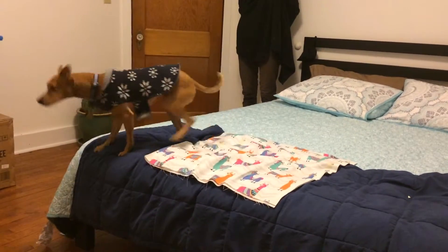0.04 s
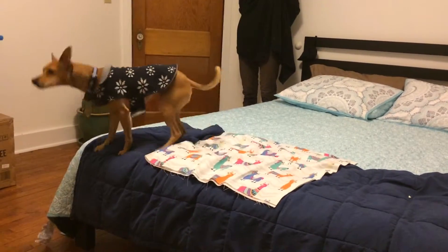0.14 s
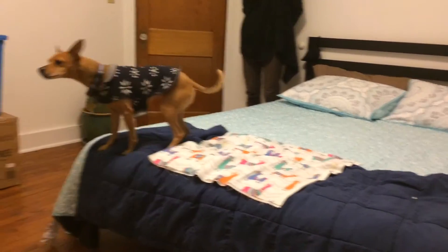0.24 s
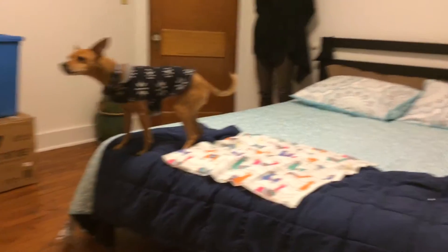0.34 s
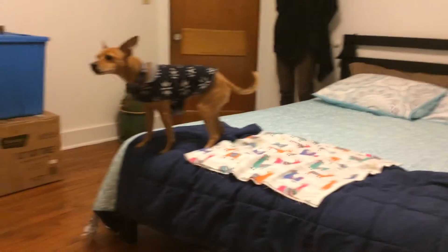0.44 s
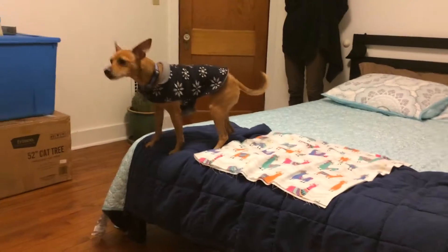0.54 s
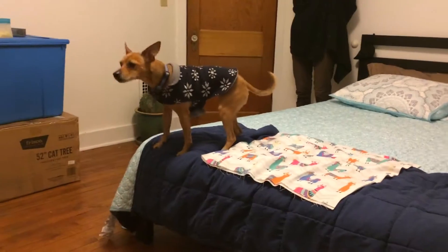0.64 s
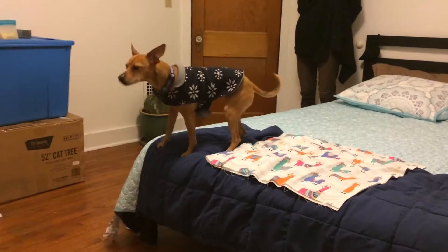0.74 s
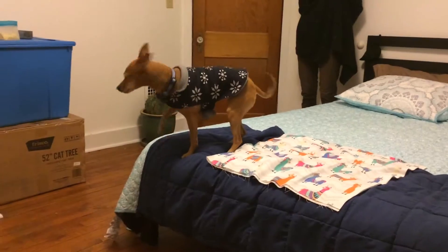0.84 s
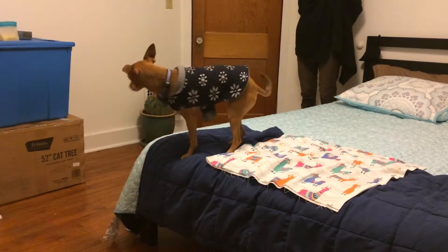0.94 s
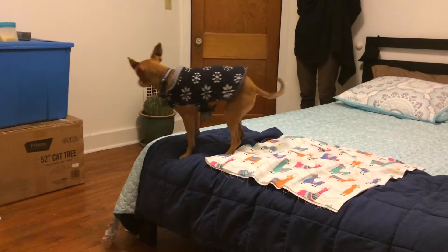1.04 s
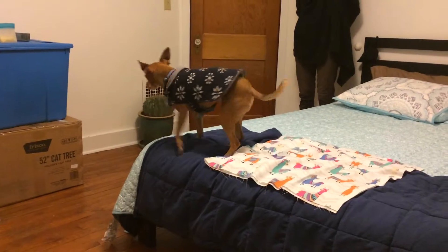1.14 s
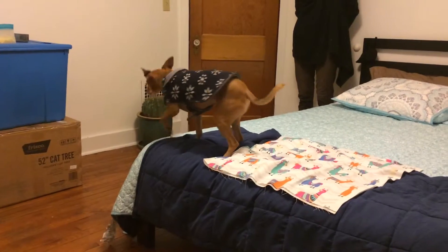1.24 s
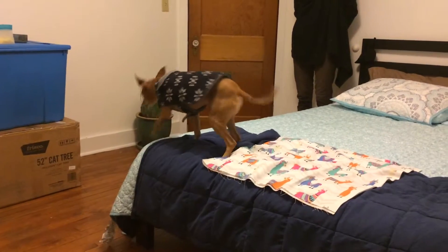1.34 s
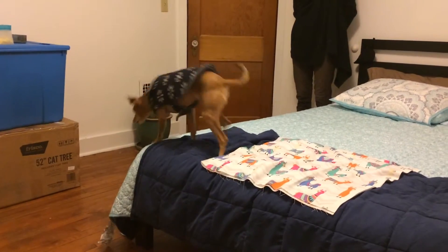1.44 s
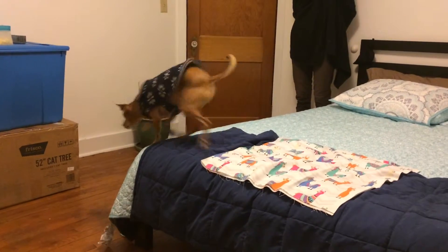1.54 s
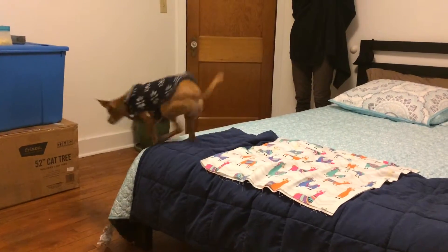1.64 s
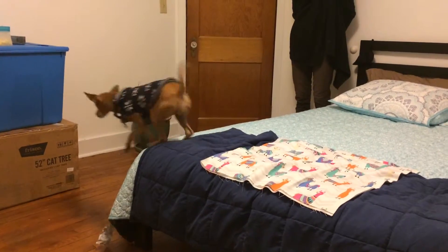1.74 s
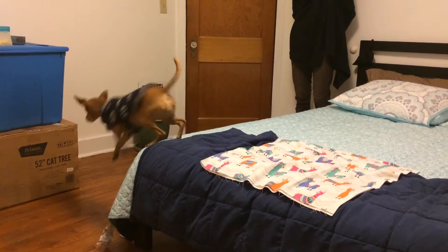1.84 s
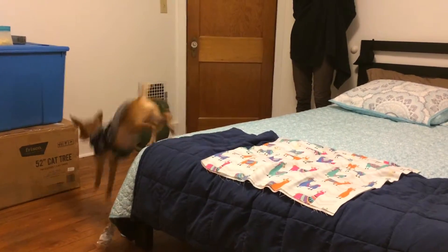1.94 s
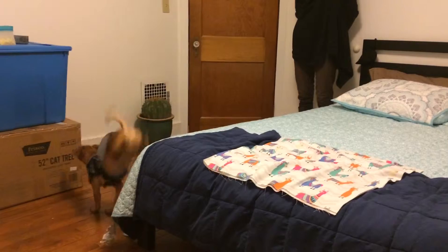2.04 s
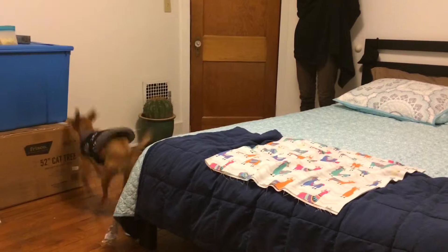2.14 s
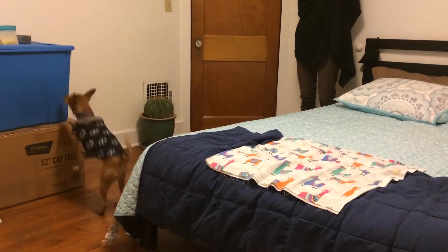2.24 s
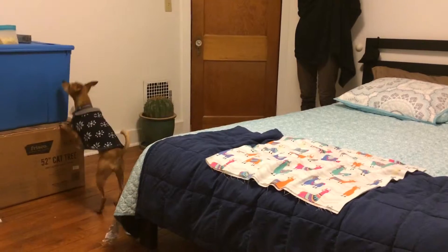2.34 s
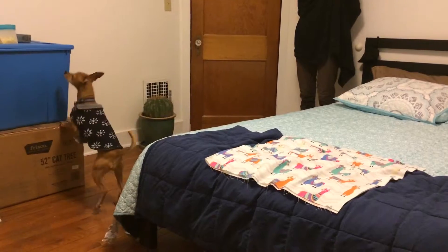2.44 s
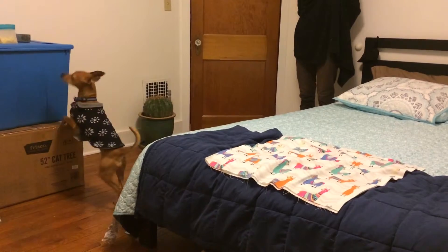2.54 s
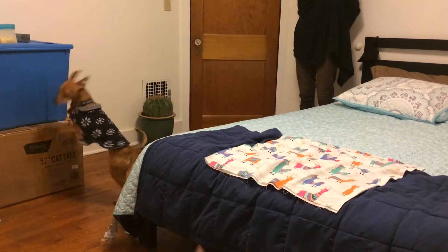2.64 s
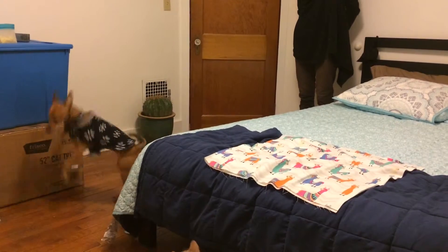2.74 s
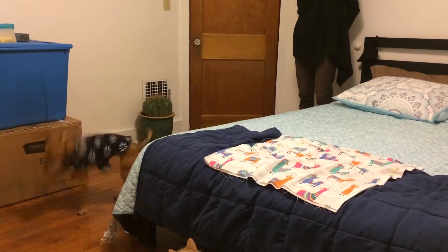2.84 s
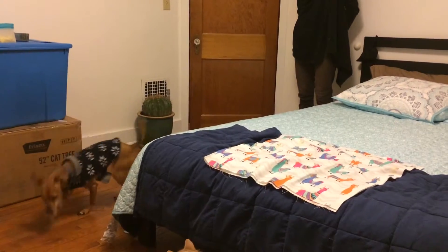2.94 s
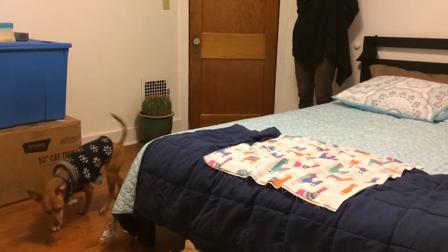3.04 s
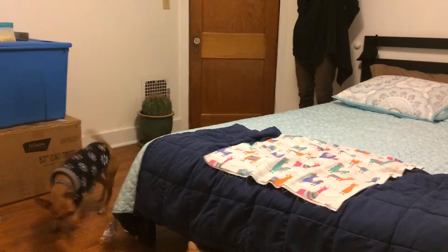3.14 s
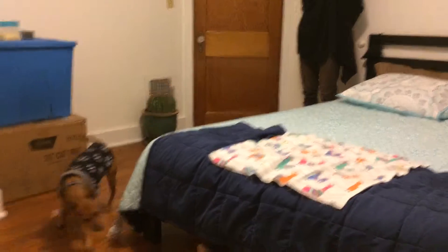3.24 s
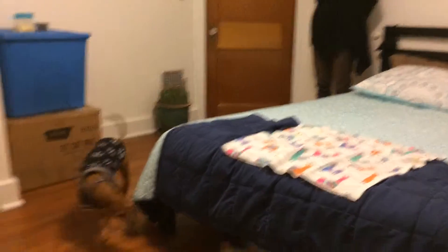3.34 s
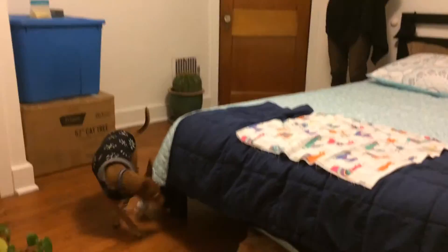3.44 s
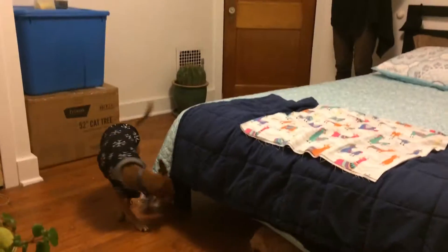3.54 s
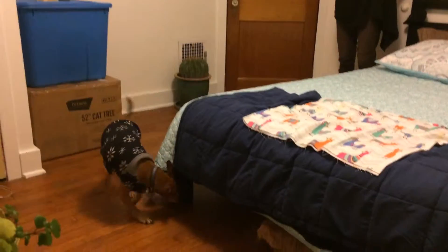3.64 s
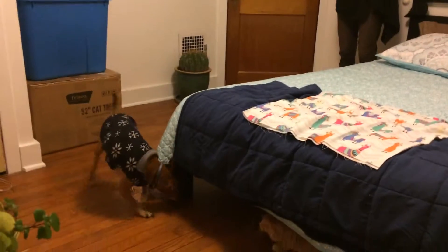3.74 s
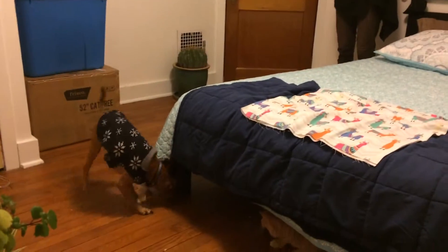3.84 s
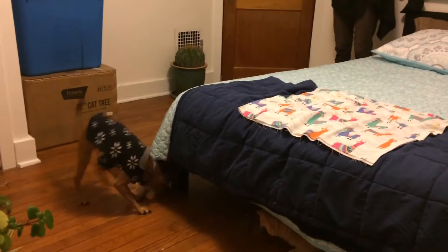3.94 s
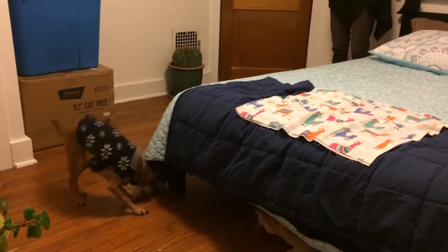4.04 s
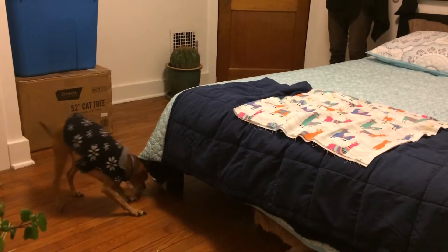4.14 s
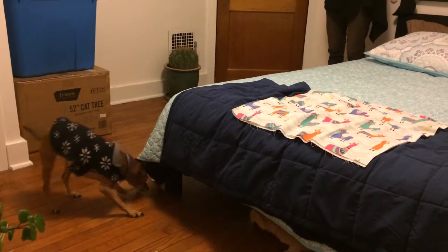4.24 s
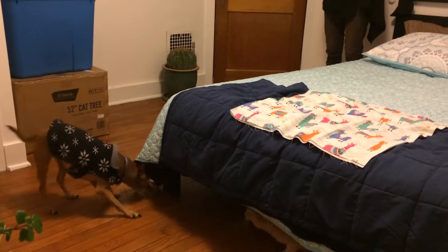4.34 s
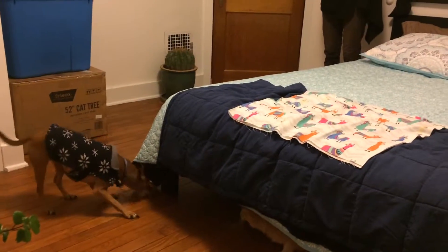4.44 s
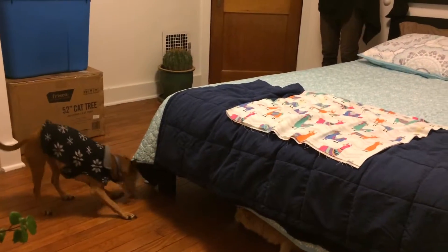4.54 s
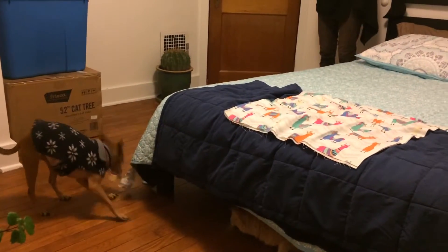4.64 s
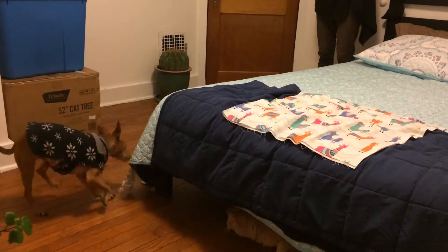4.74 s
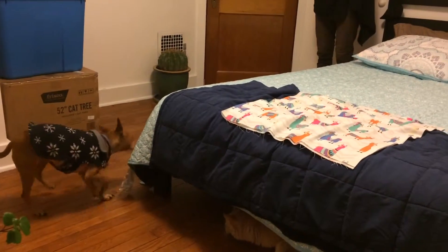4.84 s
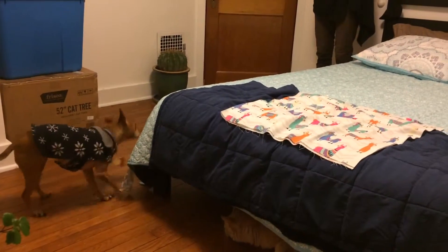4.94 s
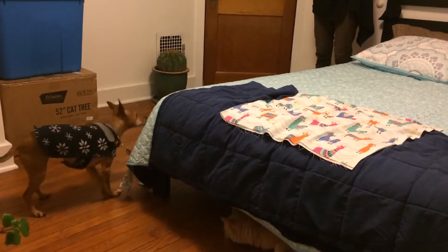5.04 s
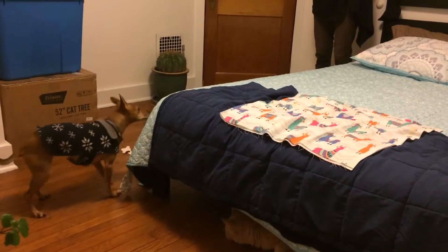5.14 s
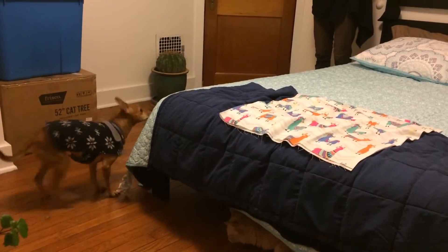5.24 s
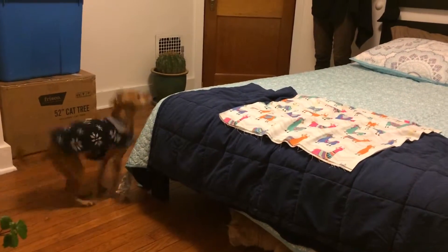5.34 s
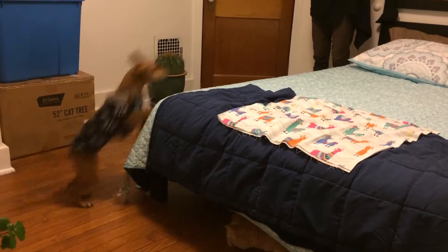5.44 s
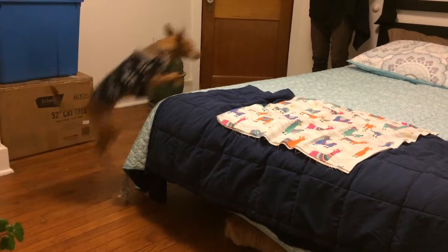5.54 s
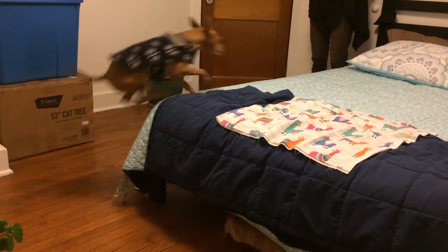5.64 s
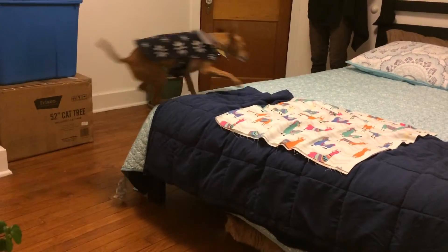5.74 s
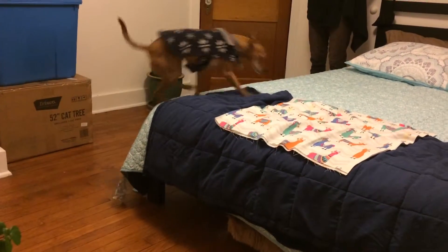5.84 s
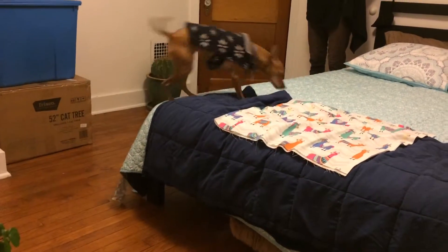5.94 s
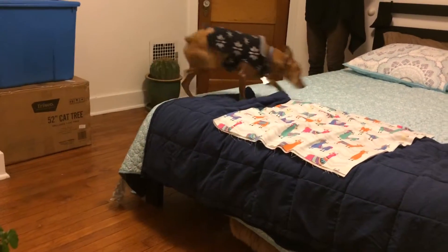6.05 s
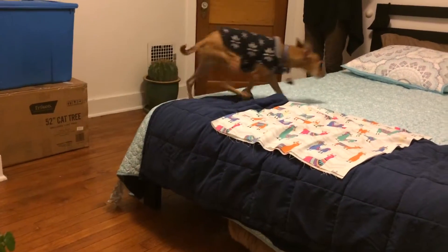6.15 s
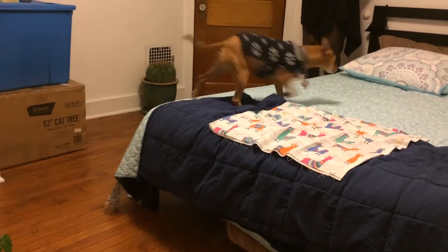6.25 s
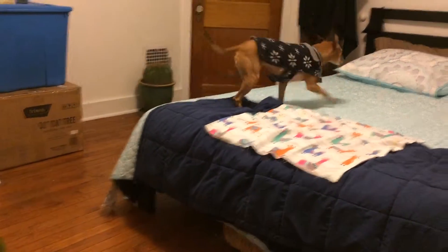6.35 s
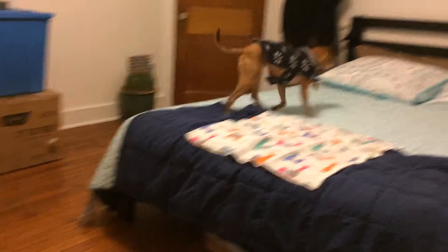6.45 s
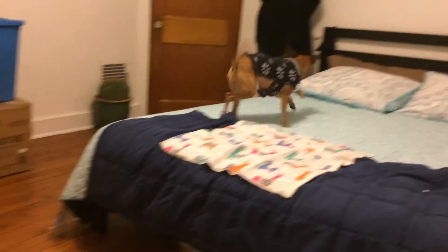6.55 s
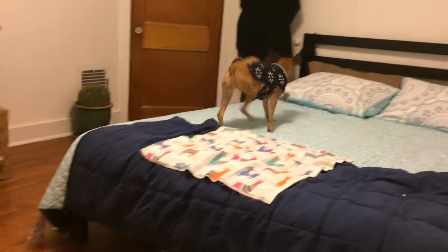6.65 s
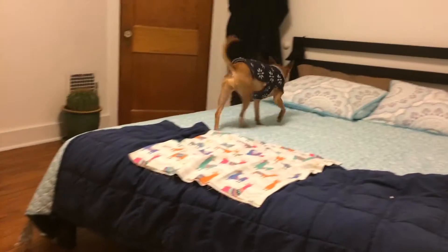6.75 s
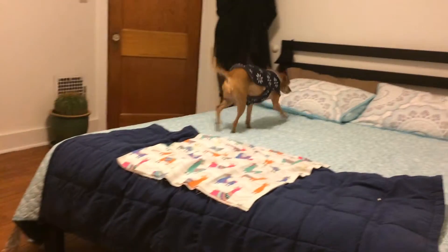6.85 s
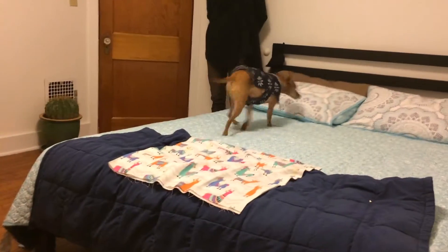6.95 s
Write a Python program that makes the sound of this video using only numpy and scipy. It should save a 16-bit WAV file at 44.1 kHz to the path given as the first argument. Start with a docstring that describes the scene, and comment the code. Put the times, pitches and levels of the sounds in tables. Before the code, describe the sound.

A small dog in a sweater rustles faintly on a bed, then drops to a wooden floor with a cluster of thumps, claw clicks and a short scrape. Its paws knock a cardboard box, tags clink, and it potters with sparse ticks. It springs back onto the bed with a bright tag jingle, then soft padding. A small, lightly reverberant bedroom, heard from a few steps away over low air noise and a faint whine.

```python
"""In a small bedroom with steady air noise and a faint whine, a small dog in a sweater steps over a quilt,
jumps down to a wooden floor, paws at a cardboard box and potters about.
Paws thump as ringing floorboards, claws tick as short bursts of coloured noise, sliding paws and
cloth are gritty noise, and collar tags are ringing metal tones. The room fades after each sound."""
import sys
import numpy as np
from scipy import signal
from scipy.fft import rfft, irfft
from scipy.io import wavfile

SR = 44100
rng = np.random.default_rng(int(sys.argv[2]) if len(sys.argv) > 2 else 0)


def store_wav(level_fs):
    """Save 16-bit WAV to argv[1]."""
    pcm = np.round(np.clip(np.atleast_2d(level_fs), -1, 1) * 32767)
    wavfile.write(sys.argv[1], SR, pcm.T.astype(np.int16))


N = 309226  # length in samples, about 7 s

# The time in which cloth strokes sound thinner and light claw ticks may fall: start and end in seconds.
THIN_CLOTH_AND_TICKS_S = (2.45, 7)


def undb(db):
    """Turn decibels into a plain factor."""
    return 10 ** (np.asarray(db) / 20)


def unit(x):
    """Scale to rms 1."""
    return x / np.sqrt(np.mean(x ** 2) + 1e-20)


def add(out, s, x):
    """Mix x into out from time s (seconds) on."""
    i = max(int(s * SR), 0)
    out[i:i + len(x)] += x[:max(len(out) - i, 0)]


def colour(x, points):
    """Filter through (Hz, dB) points without sounding early; white noise keeps its power."""
    size = 4096
    hz, db = np.transpose(points)
    log_hz = np.log(np.fft.rfftfreq(size, 1 / SR) + 1)
    gain = unit(undb(np.interp(log_hz, np.log(hz), db)))
    # folding the cepstrum forward gives a filter that reacts at once (minimum phase)
    cepstrum = irfft(np.log(gain))
    cepstrum[1:size // 2] *= 2
    cepstrum[size // 2 + 1:] = 0
    response = irfft(np.exp(rfft(cepstrum)))
    return signal.fftconvolve(x, response)[:len(x)]


def ring(modes, scatter_db, detune):
    """Decaying tones of a struck body; each blow weights and tunes them a little differently."""
    t = np.arange(SR // 2) / SR
    hz, db, t60 = np.transpose(modes)[:, :, None]
    chance = rng.standard_normal((2, len(modes), 1))
    gain = undb(db + scatter_db * chance[0])
    tones = np.sin(2 * np.pi * hz * (1 + detune * chance[1]) * t)
    fades = np.exp(-np.log(1000) * t / t60)
    return (gain * tones * fades).sum(0) / np.sqrt(np.sum(gain ** 2) / 2)


def crack(ms):
    """A contact: one sharp strike, then micro-impacts that die within milliseconds."""
    t_ms = np.arange(SR // 10) * 1000 / SR
    fade = 0.23 * np.exp(-t_ms / 2.15) + 0.65 * np.exp(-t_ms / ms)
    impacts = rng.standard_normal(len(t_ms)) * fade
    strike_db = 9
    return impacts + undb(strike_db) * signal.unit_impulse(len(t_ms))


def friction(count, grain_db):
    """Noise that catches and slips from one millisecond to the next."""
    hold = SR // 1000
    steps = undb(grain_db * rng.standard_normal(count // hold + 1))
    grip = np.repeat(steps, hold)[:count]
    return unit(grip * rng.standard_normal(count))


# Tone balance of the room noise. Each row: frequency in Hz, relative level in dB per Hz.
AIR_BALANCE = [(15, -42), (25, -40), (38, -7), (66, -2), (223, -15.5), (309, -17.5), (394, -22),
               (2000, -31), (2160, -28), (2690, -30.5), (3080, -31.5), (7110, -34.5), (14400, -38.5),
               (16000, -36)]
# The faint whine. Each row: frequency in Hz, level in dB.
WHINE_TONES = [(2638, -83), (2762, -83.5)]


def air():
    """Steady room noise with thin tones whose phase wanders at random, so the whine wavers."""
    t = np.arange(N) / SR
    noise_db = -63.05
    out = undb(noise_db) * colour(rng.standard_normal(N), AIR_BALANCE)
    for hz, db in WHINE_TONES:
        drift = 0.012 * np.cumsum(rng.standard_normal(N))  # radians
        out += undb(db) * unit(np.sin(2 * np.pi * hz * t + drift))
    return out


# How long the room rings. Each row: frequency in Hz, time to fade by 60 dB in seconds.
ROOM_DECAY = [(100, 0.62), (400, 0.38), (1000, 0.35), (3000, 0.32), (7000, 0.28), (15000, 0.21)]


def bedroom(x, wet_db):
    """Direct sound, then a dense tail, longest in the bass and drawn afresh every 0.2 s."""
    t = np.arange(SR // 2) / SR
    hz, t60 = np.transpose(ROOM_DECAY)
    pitch = np.log(np.fft.rfftfreq(len(t), 1 / SR) + 1)
    bands = np.array([np.interp(pitch, np.log(hz), share) for share in np.eye(len(hz))])
    onset = np.clip((t - 0.003) / 0.001, 0, 1)  # near surfaces answer after a few ms
    fades = np.exp(-np.log(1000) * t / t60[:, None]) * onset
    out = x.copy()
    hop = SR // 5  # the tails crossfade, so the fine colour keeps varying
    for i in range(-hop, N, hop):
        at = np.arange(max(i, 0), min(i + 2 * hop, N))
        here = x[at] * (1 - abs(at - i - hop) / hop)
        noise = rfft(rng.standard_normal(len(t)))
        tail = (irfft(bands * noise, len(t)) * fades).sum(0)
        tail /= np.linalg.norm(tail)
        add(out, i / SR, undb(wet_db) * signal.fftconvolve(here, tail))
    return out


# Strokes of sweater and quilt as the dog shifts.
# Each row: peak time in seconds, length in seconds (stretched 1.58 times when played), relative level in dB.
CLOTH_STROKES = [(.055, .076, -53), (0.907, 0.15, -60), (1.094, 0.058, -60), (1.214, 0.07, -65.5),
                 (1.611, 0.26, -64), (2.72, .6, -61.5), (3.165, .17, -59), (3.576, 0.32, -59),
                 (4.115, 0.1, -63), (4.294, 0.096, -58), (4.615, 0.16, -60), (4.769, .16, -58.5),
                 (5.123, 0.17, -59.5), (5.333, 0.098, -54.5), (5.537, 0.26, -60.5), (5.934, 0.088, -53.5),
                 (6.081, 0.039, -57), (6.291, 0.12, -61.5), (6.604, 0.28, -66.5), (6.872, 0.13, -67.5)]
# Tone balance of rubbing cloth. Each row: frequency in Hz, relative level in dB per Hz.
CLOTH_BALANCE = [(150, -26), (250, -2), (452, -2), (775, -1), (1450, 2.5), (4410, -4), (4820, -6),
                 (8400, -6.5), (13900, -7.5), (16000, -15)]
# Change that makes the rubbing thinner. Each row: frequency in Hz, relative change in dB.
THIN_BALANCE = [(200, 1), (600, -2), (1500, -0.5), (3500, 1.5), (7000, 2.5), (14000, 1)]
# Tone balance of the weight's rumble. Each row: frequency in Hz, relative level in dB per Hz.
TREAD_BALANCE = [(25, -41), (50, -15), (80, -2.5), (150, 1), (260, -10), (500, -11.5), (1200, -45)]
# the rumble under a stroke of STROKE_DB, and how it grows with the stroke (dB per dB)
STROKE_DB, TREAD_DB, TREAD_GROWTH = -54.5, -65.5, 0.27


def body():
    """Sweater and quilt rub as gritty noise, and the dog's weight rumbles in mattress and floor."""
    full_swells, thin_swells, tread = np.zeros((3, N))
    thin_start, thin_end = THIN_CLOTH_AND_TICKS_S
    for s, length, db in CLOTH_STROKES:
        swell = np.hanning(int(1.58 * length * SR))
        start = s - len(swell) / SR / 2
        strokes = thin_swells if thin_start < s < thin_end else full_swells
        add(strokes, start, undb(db) * swell)
        add(tread, start, undb(TREAD_DB + TREAD_GROWTH * (db - STROKE_DB)) * swell)
    cloth = colour(friction(N, grain_db=6.0), CLOTH_BALANCE)
    weight = colour(rng.standard_normal(N), TREAD_BALANCE)
    full_rub = undb(-3) * cloth * full_swells
    thin_rub = undb(-2.5) * colour(cloth, THIN_BALANCE) * thin_swells
    return full_rub + thin_rub + tread * weight


# Collar tags knocking together.
# Each row: start in seconds, relative level in dB, hardness from 0 to 1, the tag that rings.
TAG_KNOCKS = [(2.2702, -22.5, 1, "large"), (2.4744, -25.5, 0.78, "medium"), (2.6281, -34.5, 0.1, "large"),
              (3.6613, -35, .5, "large"), (3.8334, -48, 0.8, "large"), (4.831, -42.5, 0.79, "large"),
              (4.957, -48.5, 0.68, "large"), (5.5657, -24, 0.56, "large"), (5.6233, -28, 0.1, "medium"),
              (5.719, -41, 0.6, "large"), (5.7855, -17.5, 0.12, "medium"), (5.829, -28.5, 0.34, "medium"),
              (5.9003, -14.5, .78, "medium"), (5.9379, -19, 0.73, "small"), (5.9507, -25.5, .5, "large"),
              (6.0733, -36.5, 0.6, "large"), (6.1086, -21, 0.23, "small"), (6.2404, -44.5, 0.99, "large"),
              (6.557, -48, 0.65, "large")]


def bounces(count):
    """Each knock and its weaker, softer rebounds, as rows like those of TAG_KNOCKS."""
    gap_s, loss_db, hardness_kept = 0.007, -7, 0.66  # longest gap; change per touch
    rows = []
    for s, db, hardness, tag in TAG_KNOCKS:
        gap = gap_s * rng.uniform(0.54, 1)
        for k in range(count):
            rows.append((s + k * gap, db + k * loss_db, hardness * hardness_kept ** k, tag))
    return rows


# Ringing tones of the metal.
# Each row: frequency in Hz, relative level in dB, time to fade by 60 dB in seconds.
TAG_MODES = [(8630, -12, 0.11), (8600, -18, 0.048), (8960, -46.5, 0.24), (10000, -6, 0.17),
             (10370, 10, 0.076), (10380, 15.5, 0.071), (11810, 10.5, 0.075), (11470, -25, 0.076),
             (12000, -26, 0.059), (13800, -12, 0.08), (13850, -19, 0.055), (14700, 0, 0.2)]
# The three tags. Each entry: name, then the brightest frequency in Hz and the low ping in Hz.
TAG_PITCHES = {"large": (10300, 3800), "medium": (11800, 3880), "small": (11900, 3365)}
# Tone balance of the tags' chatter. Each row: frequency in Hz, relative level in dB per Hz.
CHATTER_BALANCE = [(7400, -33), (8500, -2), (10400, -14), (12000, 5), (12800, -13), (16000, -13)]
# Tone balance of their clack. Each row: frequency in Hz, relative level in dB per Hz.
CLACK_BALANCE = [(700, -35.5), (2200, -25.5), (3000, -9.5), (5000, -8), (7500, 1), (11000, -1), (16000, -3)]
# how far a tag's own tones stand out, and over what range
VOICE_DB, VOICE_WIDTH_HZ = 9.5, 910
# clack of the hardest knock against its ring, and how much less the softest gives
CLACK_DB, CLACK_RANGE_DB = 0.5, 28.5
# the low ping, how far a hard knock chokes it, and its flutter: it is a close pair of tones
PING_DB, PING_CHOKE_DB, PING_BEAT_HZ = -20.5, 8.5, 13.4


def tags():
    """Metal tags clack, chatter briefly and ring; a harder knock clacks more and chokes the low ping."""
    rings, chatter, clacks = np.zeros((3, N))
    for s, ring_db, hardness, tag in bounces(count=2):
        bright_hz, ping_hz = TAG_PITCHES[tag]
        modes = []
        for hz, db, t60 in TAG_MODES:
            boost = VOICE_DB * np.exp(-((hz - bright_hz) / VOICE_WIDTH_HZ) ** 2)
            modes.append((hz, db + boost, t60))
        add(rings, s, undb(ring_db) * ring(modes, scatter_db=4.5, detune=0.007))
        ping = ring([(ping_hz, 0, 0.2)], scatter_db=0, detune=0.004)
        beat = np.sin(np.pi * PING_BEAT_HZ * np.arange(len(ping)) / SR)
        ping_db = ring_db + PING_DB - PING_CHOKE_DB * hardness
        add(rings, s, undb(ping_db) * ping * beat)
        add(chatter, s, undb(ring_db) * crack(ms=4.4))
        clack_db = ring_db + CLACK_DB - CLACK_RANGE_DB * (1 - hardness)
        add(clacks, s, undb(clack_db) * crack(ms=4.1))
    bright_chatter = undb(-12) * colour(chatter, CHATTER_BALANCE)
    return undb(-14.0) * rings + bright_chatter + colour(clacks, CLACK_BALANCE)


# Paws sliding and pushing on wood, cardboard and bedding.
# Each row: start in seconds, length in seconds, relative level in dB, centre frequency in Hz.
PAW_SLIDES = [(1.171, 0.012, -56, 4630), (2.086, 0.059, -39, 1310), (2.1, 0.081, -45, 338),
              (2.327, 0.051, -39, 430), (2.147, .05, -42.5, 8900), (2.329, 0.024, -41.5, 2250),
              (2.364, .043, -43.5, 3730), (2.807, 0.02, -48, 4380), (3.172, 0.017, -51, 4080),
              (3.238, 0.054, -54.5, 2360), (3.443, 0.0077, -57.5, 830), (3.477, 0.021, -51.5, 4830),
              (3.866, 0.011, -46.5, 3730), (4.774, 0.044, -56.5, 4400), (5.43, 0.084, -53.5, 780),
              (5.475, 0.026, -46.5, 3350), (6.256, .048, -61, 670), (6.851, 0.051, -63, 800)]


def scuffs():
    """Sliding paws: gritty friction that swells fast and fades, in one broad resonance."""
    out = np.zeros(N)
    for s, length, db, hz in PAW_SLIDES:
        u = np.linspace(0, 1, int(length * SR))
        edges = [hz / 1.6, min(hz * 1.6, SR / 2 - 1)]
        band = signal.butter(2, edges, "band", fs=SR, output="sos")
        grit = unit(signal.sosfilt(band, friction(len(u), grain_db=5)))
        swell = np.sin(np.pi * np.sqrt(u))
        add(out, s, undb(db) * grit * swell)
    return out


# Paws landing on boards and bed.
# Each row: start in seconds, relative level in dB, contact time in milliseconds.
PAW_LANDINGS = [(1.465, -55, 5), (2.082, -31, 1), (2.115, -26.5, 3.1), (2.147, -31.5, 11),
                (2.284, -28.5, 3), (2.388, -35.5, 11.3), (2.953, -32.5, 4), (3.575, -48, 2.8),
                (3.905, -50.5, 6.4), (4.394, -52, 5.4), (5.066, -49.5, 2.5), (5.433, -37, 1.5),
                (5.47, -33.5, 2.4)]
# Ringing floorboards. Each row: frequency in Hz, relative level in dB, time to fade by 60 dB in seconds.
BOARD_MODES = [(51, -9, 0.29), (77.2, -17, 0.34), (110.5, -10, 0.24), (162, -23, 0.11), (176.7, 11.5, 0.11),
               (246, -3.5, 0.3), (316, -3, 0.24), (386, 2.5, 0.085), (460, -3, 0.36)]


def thuds():
    """A soft pad pushes the boards; the longer the push, the deeper the thump."""
    out = np.zeros(N)
    for s, db, ms in PAW_LANDINGS:
        push = np.hanning(max(int(ms * SR / 1000), 3))
        thump = signal.fftconvolve(ring(BOARD_MODES, scatter_db=3.0, detune=0.016), push)
        add(out, s, undb(db) * thump / np.abs(thump).max())
    # small boards radiate little deep bass
    low_cut = signal.butter(4, 54, "high", fs=SR, output="sos")
    return undb(5.0) * signal.sosfilt(low_cut, out)


def patter():
    """Light claw ticks at random moments, as rows like those of CLAW_STRIKES."""
    per_second, level_db, spread_db, bright_db = 5, -60.5, -0.5, 8
    start, end = THIN_CLOTH_AND_TICKS_S
    rows = []
    for when, size in rng.random((int(per_second * (end - start)), 2)):
        rows.append((start + (end - start) * when, level_db + spread_db * (2 * size - 1), bright_db))
    return rows


# Claws striking wood. Each row: start in seconds, relative level in dB,
# brightness in dB (below 0 a flat paw, above 0 the claw tip).
CLAW_STRIKES = [(2.0817, -43, -14), (2.0855, -32, 2.5), (2.103, -28, 0), (2.144, -28, 5.5),
                (2.2031, -34, -2.5), (2.2697, -28.5, -4), (2.366, -26.5, -8), (2.379, -31.5, 0.5),
                (2.7942, -50, 13), (2.8117, -31.5, -3.5), (2.948, -34, 0.5), (2.9515, -30.5, 3.5),
                (3.0806, -47, -1), (3.2422, -31, -0.5), (3.8658, -32.5, -3), (3.8924, -43.5, -9),
                (4.3804, -41, -0.5), (5.0737, -39, 7.5), (5.2923, -44, -0.5), (5.436, -45, 7.5)]
# Tone balance of the woody knock. Each row: frequency in Hz, relative level in dB per Hz.
KNOCK_BALANCE = [(120, -23.5), (300, -7.5), (600, -5), (1500, -6), (2200, -5), (4000, -38.5)]
# Tone balance of the click. Each row: frequency in Hz, relative level in dB per Hz.
CLICK_BALANCE = [(900, -14.5), (2000, -3.5), (3200, 2.5), (6000, -1), (8000, -5.5), (13000, -22.5)]
# Tone balance of the snap of horn. Each row: frequency in Hz, relative level in dB per Hz.
SNAP_BALANCE = [(4000, -6), (7000, 1), (10000, 6.5), (13000, 3.5), (16000, -2)]
# lighter steps than FIRM_DB lose knock faster than click (extra dB per dB)
FIRM_DB, KNOCK_GROWTH = -28, 0.24


def claws():
    """Claws give a woody knock, a click and a snap of horn; a firm flat paw knocks, a tip snaps."""
    knock, click, snap = np.zeros((3, N))
    for s, db, bright_db in list(CLAW_STRIKES) + patter():
        knock_db = db - bright_db + KNOCK_GROWTH * (db - FIRM_DB)
        add(knock, s, undb(knock_db) * crack(ms=7.0))
        add(click, s, undb(db) * crack(ms=5.56))
        add(snap, s, undb(db + bright_db) * crack(ms=4.3))
    woody_knock = undb(-12.5) * colour(knock, KNOCK_BALANCE)
    dry_click = undb(-3) * colour(click, CLICK_BALANCE)
    bright_snap = undb(-6) * colour(snap, SNAP_BALANCE)
    return woody_knock + dry_click + bright_snap


def scene():
    """Paws, cloth, tags and boards in the bedroom, over its steady air."""
    contacts = bedroom(claws() + scuffs() + body(), wet_db=1.5)
    metal = bedroom(tags(), wet_db=2.5)
    boards = bedroom(thuds(), wet_db=-5)
    return (contacts + metal + boards + air())[None]


def record(dry):
    """The recorder steeply cuts the treble above 15.9 kHz."""
    top_cut = signal.ellip(10, 0.2, 70, 15900, fs=SR, output="sos")
    return signal.sosfilt(top_cut, dry)


dry = scene()
out = record(dry)
store_wav(out)
```